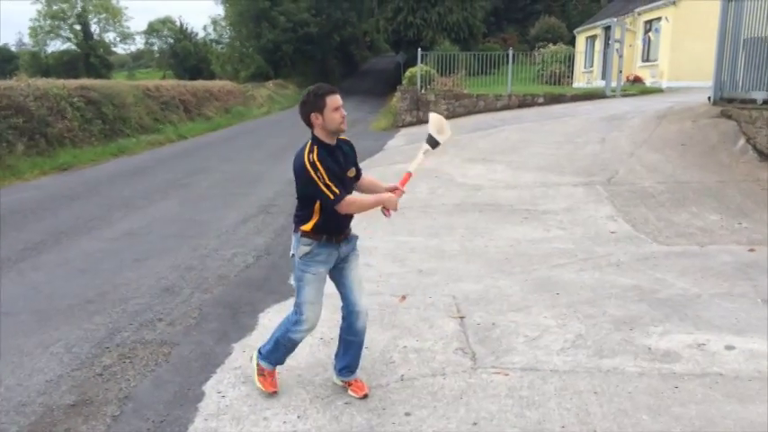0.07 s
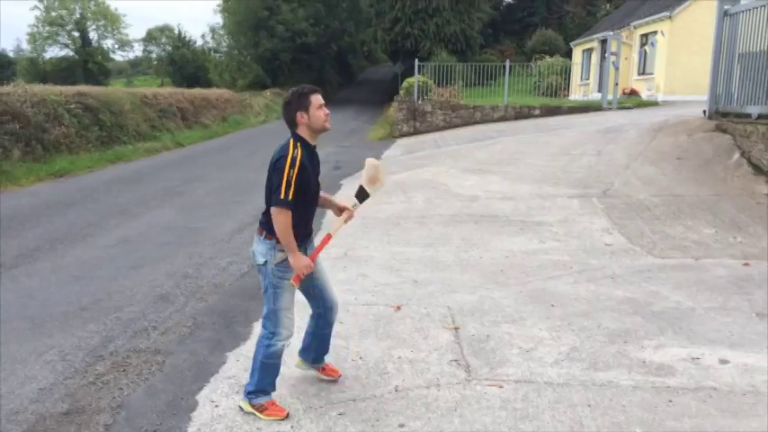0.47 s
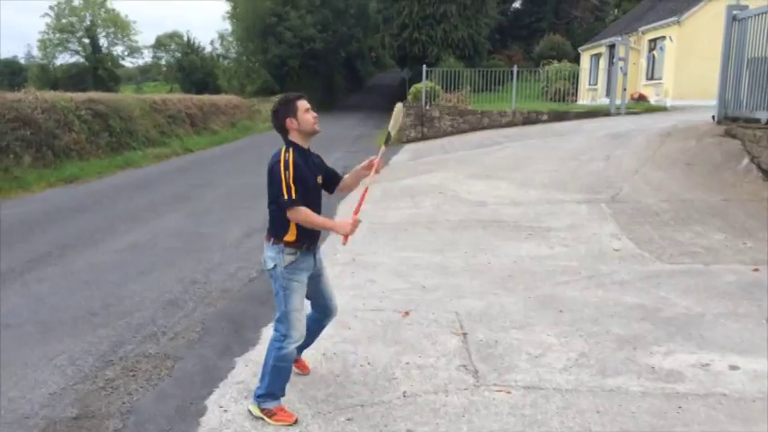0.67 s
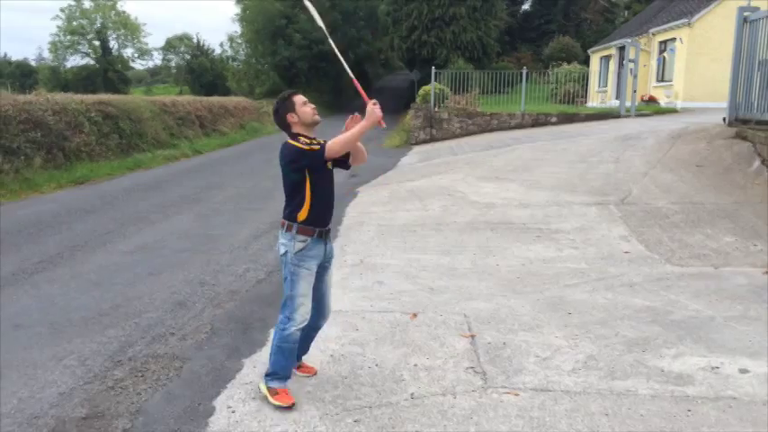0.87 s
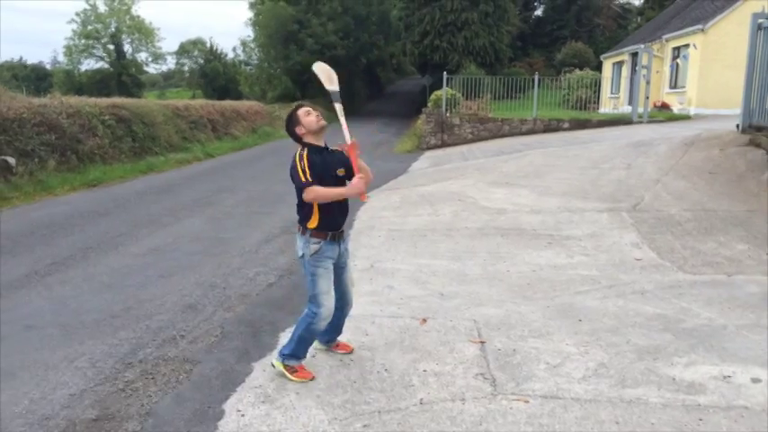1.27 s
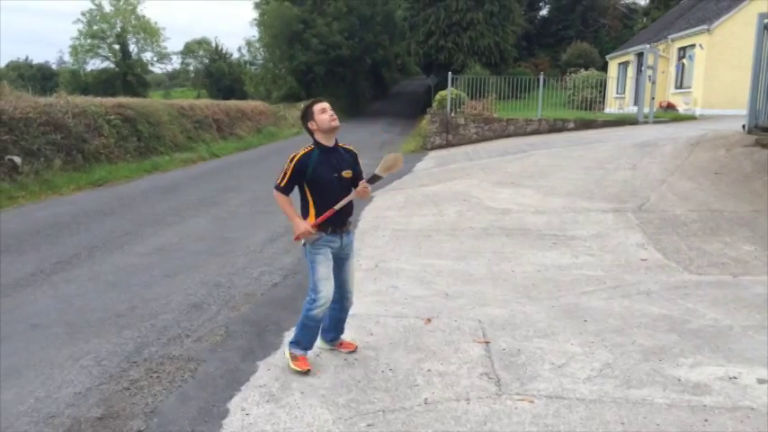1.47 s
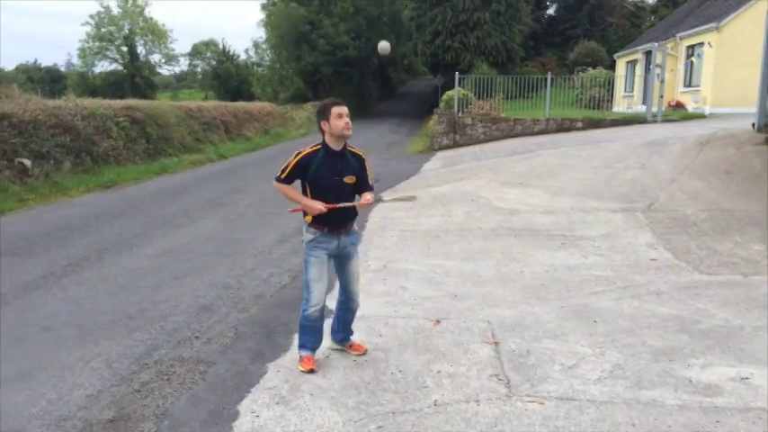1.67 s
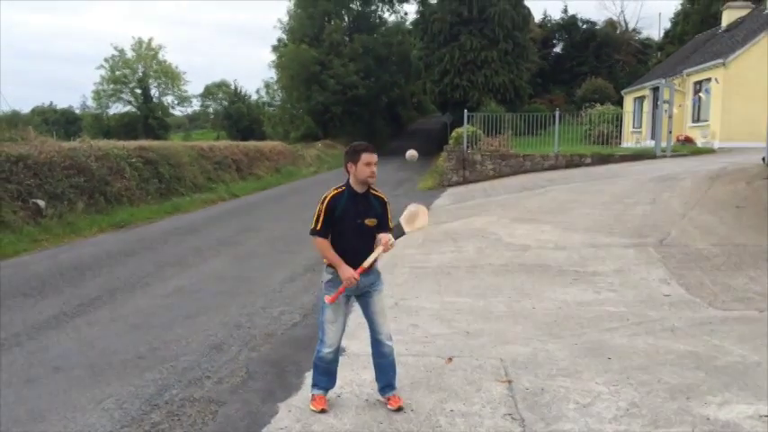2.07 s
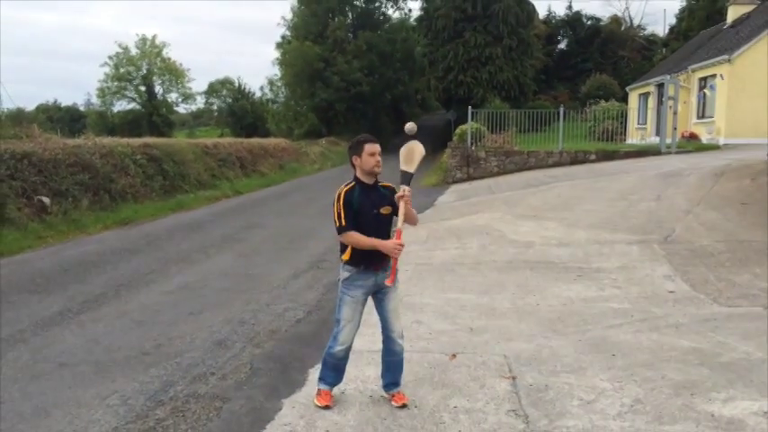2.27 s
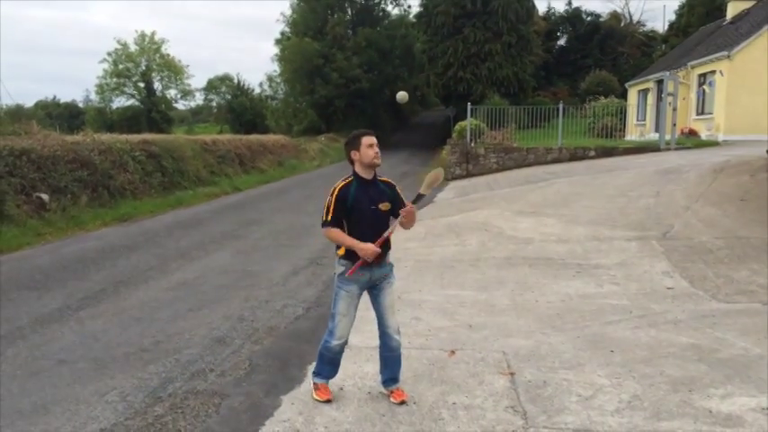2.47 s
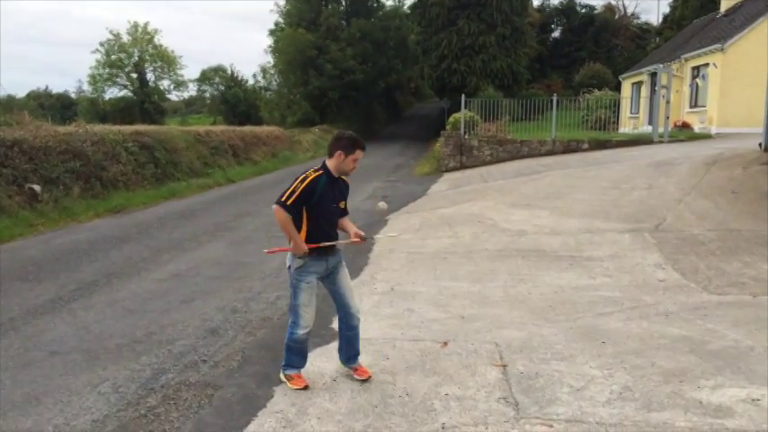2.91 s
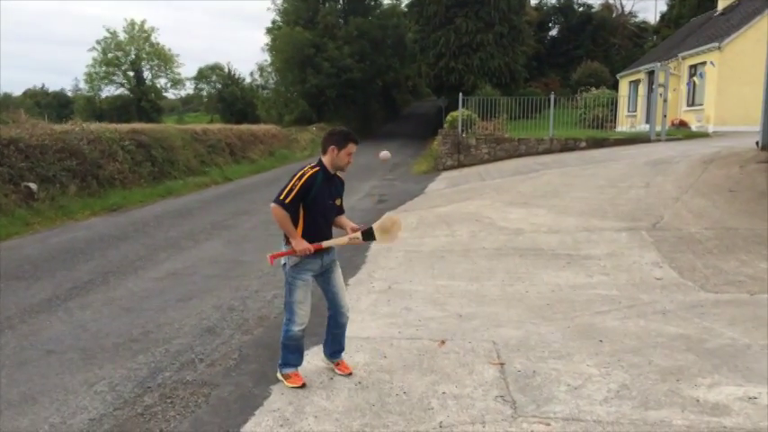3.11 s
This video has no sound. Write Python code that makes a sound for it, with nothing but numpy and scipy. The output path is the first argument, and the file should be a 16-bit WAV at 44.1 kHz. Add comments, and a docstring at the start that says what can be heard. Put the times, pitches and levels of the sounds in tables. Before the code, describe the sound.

A small hard ball knocks on a flat wooden stick at about 0.3, 1.1, 1.9 and 3 seconds, each a sharp crack with a short thud and a slight outdoor echo. The first is the loudest. In between, shoes scuff softly and grit ticks on concrete. A low rumble, a distant motor hum and a very faint high whine run underneath. The sound stops just after the last knock.

```python
"""A concrete driveway by a quiet road, one microphone near a player who keeps a small hard ball in the
air with a flat wooden stick. Outdoor rumble and the hum of a motor some way off swell in at once and
stay, with a faint high whine. Four knocks follow, about a second apart: each a crack and a short wooden
thud, repeated by the ground and a wall. In between, shoes scuff, grit ticks and a soft hiss comes and
goes. The sound stops just after the last knock."""
import sys
import numpy as np
from scipy import signal
from scipy.fft import rfft, irfft
from scipy.io import wavfile

SR = 44100
rng = np.random.default_rng(int(sys.argv[2]) if len(sys.argv) > 2 else 0)


def wav_out(sig):
    """Save sig, one row per channel (or a flat mono array), as 16-bit PCM at SR to the path in sys.argv[1]."""
    wavfile.write(sys.argv[1], SR, np.round(np.clip(np.atleast_2d(sig).T, -1, 1) * 32767).astype(np.int16))


N = 143325
TIME = np.arange(N) / SR
FREQS_HZ = np.arange(N // 2 + 1) * SR / N
CRACK_LOW_HZ = 890   # lower edge of the crack and of its smear off the ground


def from_db(db):
    """Decibels to gain."""
    return 10 ** (np.asarray(db) / 20)


def unit_rms(x):
    """Scale to an rms of 1."""
    return x / np.sqrt(np.mean(x ** 2) + 1e-20)


def band(x, hz, kind, order=2):
    """Causal Butterworth filter."""
    sos = signal.butter(order, np.clip(hz, 10, .45 * SR), kind, fs=SR, output="sos")
    return signal.sosfilt(sos, x + 1e-18)


def resonance(x, hz, q):
    """One resonance with gain 1 at its peak."""
    return signal.lfilter(*signal.iirpeak(min(hz, SR / 3), max(q, .5), fs=SR), x + 1e-18)


def drift(rate_hz):
    """Random motion with a spread of about 1."""
    knots = rng.standard_normal(400)
    return np.interp(TIME * rate_hz, np.arange(len(knots)), knots)


def swell(peak_s, length_s):
    """A bell-shaped envelope, length_s wide at 1/e of its peak."""
    return np.exp(-(2 * (TIME - peak_s) / length_s) ** 2)


def burst(t60_s, size):
    """Dying noise with an energy of 1."""
    noise = rng.standard_normal(size) * from_db(-60 * TIME[:size] / t60_s)
    return noise / np.sqrt(np.sum(noise ** 2))


def narrow_noise(hz, width_hz):
    """An unsteady tone: noise in one narrow resonance."""
    spectrum = rfft(rng.standard_normal(N)) / (1 + ((FREQS_HZ - hz) / width_hz) ** 2)
    return unit_rms(irfft(spectrum, N))


def add(out, start_s, x):
    """Mix x into out from start_s on."""
    i = max(int(round(start_s * SR)), 0)
    out[i:i + len(x)] += x[:max(len(out) - i, 0)]


def air():
    """Distant rumble and the faint even hiss of the open air."""
    # spectrum of the outdoor noise: frequency_hz, relative_db
    air_spectrum = [(20, -22), (40, -18.5), (65, 3.5), (80, -2), (100, -1.5), (122, -12), (145, -1.5),
                    (165, -8.5), (190, -10), (250, -23.5), (320, -23), (420, -31), (600, -34.5), (950, -40),
                    (1500, -41), (2000, -34), (2700, -43.5), (3300, -41), (5500, -49.5), (9000, -55.5),
                    (15000, -64)]
    hz, db = np.transpose(air_spectrum)
    shape = from_db(np.interp(np.log(np.maximum(FREQS_HZ, 1)), np.log(hz), db))
    return from_db(-43.5) * unit_rms(irfft(rfft(rng.standard_normal(N)) * shape, N))


def motor(pitch_hz=148.7, wander=0.0042, waver_db=0.5):
    """A motor some way off hums steadily, wavering a little in pitch and level."""
    # harmonics of the hum: multiple, level_db
    harmonics = [(1, -41.5), (2, -61.5)]
    phase = 2 * np.pi * np.cumsum(pitch_hz * (1 + wander * drift(7.6))) / SR
    return sum(np.sqrt(2) * from_db(db + waver_db * drift(4.6)) * np.sin(multiple * phase)
               for multiple, db in harmonics)


def whine(pitch_hz=2478, wander=0.002, rest_db=-77):
    """One thin tone that comes and goes, with two fainter unsteady ones above it."""
    # swells of the strongest tone: peak_s, length_s, level_db
    tone_swells = [(0.173, 0.088, -63), (0.454, 0.062, -63), (0.774, 0.028, -73), (0.84, 0.04, -65),
                   (0.977, 0.037, -66), (1.283, 0.14, -77), (1.475, 0.099, -76), (1.618, 0.088, -71.5),
                   (1.883, 0.14, -73.5), (2.083, 0.076, -71), (2.304, .08, -79), (2.478, 0.11, -68),
                   (2.692, 0.1, -69), (2.854, 0.083, -71.5)]
    # a fainter tone that slowly grows: pitch_hz, width_hz, start_db, growth_db_per_s
    growing_tones = [(2694, 6, -84.5, 2)]
    # course of a thin shrill band, like a far insect: time_s, level_db
    shrill_levels = [(0, -85), (.47, -84), (.5, -76.5), (.75, -77.5), (1.1, -81), (3, -80.5)]
    phase = 2 * np.pi * np.cumsum(pitch_hz * (1 + wander * drift(25))) / SR
    swells = sum(from_db(db) * swell(peak_s, length_s) for peak_s, length_s, db in tone_swells)
    tone = np.sqrt(2) * (from_db(rest_db) + swells) * np.sin(phase)
    faint = sum(from_db(db + growth * TIME) * narrow_noise(hz, width_hz)
                for hz, width_hz, db, growth in growing_tones)
    shrill_db = np.interp(TIME, *np.transpose(shrill_levels))
    return tone + faint + from_db(shrill_db) * narrow_noise(hz=6990, width_hz=110)


def soft_hiss(low_hz=905, high_hz=7000, flutter_db=0.5):
    """A soft bright hiss that swells and dies away, most strongly after the first two knocks."""
    # swells of the hiss: peak_s, rise_s, fall_s, level_db
    hiss_swells = [(.01, 0.037, 0.054, -65.5), (.37, 0.091, 0.059, -61), (.47, 0.029, 0.015, -66.5),
                   (0.859, 0.074, 0.047, -75.5), (1.04, 0.041, 0.059, -76), (1.383, 0.0061, 0.1, -62),
                   (2.538, 0.05, 0.035, -71), (2.68, 0.022, 0.053, -69), (2.9, 0.076, 0.14, -76)]
    hiss = band(rng.standard_normal(N), low_hz, "high", order=1)
    hiss = band(hiss, high_hz, "low", order=1)
    power = np.zeros(N)
    for peak_s, rise_s, fall_s, db in hiss_swells:
        slope_s = np.where(TIME < peak_s, rise_s, fall_s)
        power += (from_db(db) * swell(peak_s, 2 * slope_s)) ** 2
    return unit_rms(hiss) * np.sqrt(power) * from_db(flutter_db * drift(54))


def scuffs(grains_per_s=1000, spread_db=4.5):
    """A sole sliding on the concrete rolls over many grains of grit."""
    # slides of a sole: peak_s, length_s, level_db, centre_hz
    slides = [(0.038, 0.098, -63, 580), (0.367, 0.055, -64, 1770), (0.883, 0.033, -63, 3100),
              (1.658, 0.092, -64.5, 2360), (1.756, 0.056, -56.5, 1070), (2.202, 0.023, -59, 3030),
              (2.54, 0.033, -60.5, 3220), (2.68, 0.092, -63, 2000), (2.695, 0.061, -60, 1000),
              (2.845, 0.039, -62, 2090)]
    grain_db = spread_db * np.minimum(rng.exponential(1, N), 4)
    grains = from_db(grain_db) * rng.choice([-1, 1], N)
    grit = grains * (rng.random(N) < grains_per_s / SR)
    return sum(from_db(db) * swell(peak_s, length_s) * unit_rms(resonance(grit, hz, q=5.4))
               for peak_s, length_s, db, hz in slides)


def thumps(length_s=0.028):
    """Soft thumps under the knocks and steps: a cycle or two of deep bass."""
    # bass pulses: peak_s, level_db, pitch_hz
    pulses = [(0.223, -30.5, 75.5), (0.304, -32, 70), (1.215, -41, 83.7), (2.869, -38, 80)]
    return sum(from_db(db) * swell(peak_s, length_s) * np.cos(2 * np.pi * hz * (TIME - peak_s))
               for peak_s, db, hz in pulses)


def ticks(t60_s=0.019, q=1.22, snap_db=-10.5, size=4096):
    """Shoes, grit and the handling of the stick tick: a sharp click and a tiny, broadly tuned crunch."""
    # light contacts: start_s, level_db, centre_hz
    contacts = [(0.3142, -21.5, 3840), (0.3558, -30.5, 4000), (0.3802, -29, 885), (0.878, -35, 3500),
                (.903, -38, 1070), (1.004, -40, 3650), (1.236, -33.5, 2400), (1.284, -36, 5900),
                (1.295, -35, 1060), (1.372, -37, 8900), (1.376, -25.5, 1520), (1.378, -27, 6700),
                (1.454, -31.5, 3480), (1.473, -30, 3180), (1.623, -31.5, 1830), (1.6635, -38, 3080),
                (1.7382, -31.5, 1490), (1.748, -24.5, 1750), (1.7557, -24.5, 970), (1.769, -30, 980),
                (1.8193, -38.5, 7000), (1.825, -45, 8000), (2.1747, -24.5, 3340), (2.1756, -28.5, 1260),
                (2.197, -40, 3170), (2.224, -34, 3180), (2.325, -34.5, 1340), (2.394, -39, 4900),
                (2.629, -35, 4940), (2.6453, -36, 7500), (2.653, -36, 4000), (2.660, -37.5, 6000),
                (2.673, -38.5, 9000), (2.675, -42, 9500), (2.6875, -30, 1670), (2.6922, -30.5, 7600),
                (2.6925, -28, 1880), (2.7103, -43, 8000), (2.832, -40, 3260), (2.8378, -28, 2800)]
    snap = from_db(snap_db) * band(signal.unit_impulse(size), hz=11500, kind="low")
    out = np.zeros(N)
    for start_s, db, hz in contacts:
        crunch = resonance(resonance(burst(t60_s, size), hz, q), hz, q)
        crunch /= np.sqrt(np.sum(crunch ** 2))
        add(out, start_s, from_db(db) * (crunch + snap))
    return out


def driveway(ground_ms, ground_db, rough_db, wall_ms, wall_db, extra_ms, scatter_db, size):
    """Paths from stick to microphone: direct, off the player, the ground and a wall, then scattered."""
    # scatter from hedge, fence and house: low_hz, high_hz, relative_db, t60_s
    scatter_bands = [(100, 420, 8, 0.15), (300, 830, 4, 0.17), (690, 2800, 3, 0.13), (2500, 3800, 1, 0.21),
                     (6010, 12000, -5, 0.093)]
    reflection_low_hz = 260
    click = signal.unit_impulse(size)
    off_player = from_db(-15) * band(burst(t60_s=0.048, size=size), reflection_low_hz, "high")
    paths = click + off_player
    # rough concrete smears its echo
    ground_smear = from_db(rough_db) * band(burst(t60_s=0.015, size=size), CRACK_LOW_HZ, "high")
    add(paths, ground_ms / 1000, from_db(ground_db) * (paths + ground_smear))
    wall_smear = from_db(3.5) * band(burst(t60_s=0.09, size=size), hz=8950, kind="low", order=1)
    wall = click + wall_smear
    add(wall, extra_ms / 1000, from_db(-4.5) * click)   # the wall's echo also returns via the ground
    add(paths, wall_ms / 1000, from_db(wall_db) * band(wall, reflection_low_hz, "high", order=1))
    for low_hz, high_hz, band_db, t60_s in scatter_bands:
        paths += from_db(scatter_db + band_db) * band(burst(t60_s, size), [low_hz, high_hz], "band")
    return paths


def strike(thud_hz, thud_db, blade_db, ring_db, lower_hz, upper_hz, bright_hz, pitch_ratio, size):
    """The crack of the contact, the thud of the ball and the quickly damped modes of the wood."""
    # low bending modes of the blade: nominal_hz, relative_db, t60_s
    blade_modes = [(427, -8, 0.014), (580, -19, 0.006)]
    # higher modes of the wood: nominal_hz, relative_db, t60_s
    wood_modes = [(990, -31.5, 0.049), (1420, -16, 0.013), (1820, -18, 0.02125), (2105, -32.5, 0.029),
                  (2310, -32, 0.014), (2820, -22, 0.049), (3320, -24, 0.027), (3720, -32, .02),
                  (4420, -35, 0.019), (5700, -29, 0.01), (6800, -31, .015), (7960, -29.5, 0.011)]
    crack_db, thud_t60_s = 11.5, 0.019
    t = TIME[:size]
    click = band(signal.unit_impulse(size), CRACK_LOW_HZ, "high", order=1)
    crack = -from_db(crack_db) * band(click, bright_hz, "low", order=1)
    # a narrow peak in the high treble sharpens the crack
    crack += from_db(-4) * resonance(crack, hz=12100, q=3)
    thud = from_db(thud_db - 60 * t / thud_t60_s) * np.sin(2 * np.pi * thud_hz * t)
    hit = crack + thud
    for modes, drive_db in ((blade_modes, blade_db), (wood_modes, ring_db)):
        for hz, db, t60_s in modes:
            hit += from_db(db + drive_db - 60 * t / t60_s) * np.sin(2 * np.pi * hz * pitch_ratio * t)
    for hz in (lower_hz, upper_hz):   # the point of impact favours some modes
        hit += from_db(-3) * resonance(hit, hz, q=3.1)
    hit = band(hit, hz=150, kind="high", order=1)   # a small blade sends out little deep bass
    return band(hit, hz=13800, kind="low", order=4)


def knocks(size=16384):
    """The ball lands on the stick, and each strike reaches the microphone with the driveway's echoes."""
    # blows of ball on stick: start_s, gain_db,
    # the strike: thud_hz, thud_db, blade_db, ring_db, lower_hz, upper_hz, bright_hz, pitch_ratio,
    # its echoes: ground_ms, ground_db, rough_db, wall_ms, wall_db, extra_ms, scatter_db
    blows = [(0.2789, -7.5, 280, -17, 0.5, -10.5, 480, 2920, 3300, 0.96, 3.5, 0, -9.5, 13.3, -17.5, 6.6, -13),
             (1.1284, -13.5, 294, -20.5, 3, -8, 1750, 5460, 4900, 0.99, 4, -9.5, 0, 22.5, -10, 5.14, -17),
             (1.9496, -20, 215, -1, -0.5, -4, 495, 2150, 6800, 0.97, 2.09, -7, -1.5, 20.3, -18, 5, -19),
             (2.9809, -15.5, 221, -4.5, 0, -0.5, 1440, 3720, 3780, 0.92, 2.075, -10.5, -1, 19.4, -18, 5.7, -23)]
    out = np.zeros(N)
    for start_s, gain_db, *settings in blows:
        hit = strike(*settings[:8], size)
        paths = driveway(*settings[8:], size)
        add(out, start_s, from_db(gain_db) * signal.fftconvolve(hit, paths)[:size])
    return out


def scene(rise_s=0.2, rise_db=8):
    """The player in front, in mono; behind, soft hiss, whine and the quickly rising hum and rumble."""
    player = knocks() + ticks() + thumps() + scuffs()
    rise = from_db(-rise_db * np.maximum(1 - TIME / rise_s, 0))
    return (player + soft_hiss() + whine() + rise * (motor() + air()))[None]


def record(dry, end_s=3.032, fade_s=0.011, cutoff_hz=15600):
    """A quick fade just after the last knock, and a steep cut of the highest treble."""
    fade = np.clip((end_s - TIME) / fade_s, 0, 1)
    lowpass = signal.ellip(10, .1, 80, cutoff_hz, fs=SR, output="sos")
    return signal.sosfilt(lowpass, dry * fade + 1e-18)


dry = scene()
out = record(dry)
wav_out(out)
```